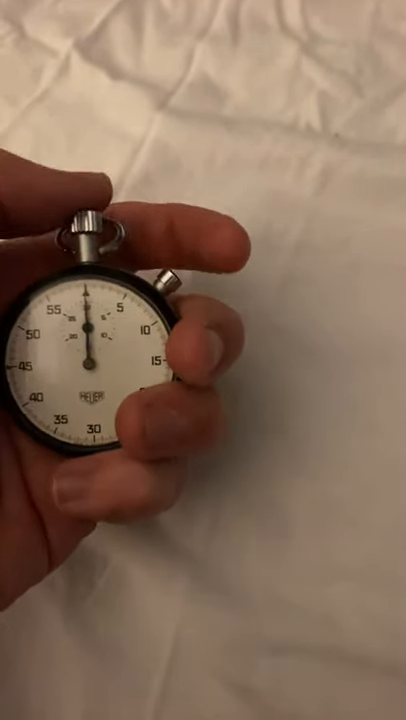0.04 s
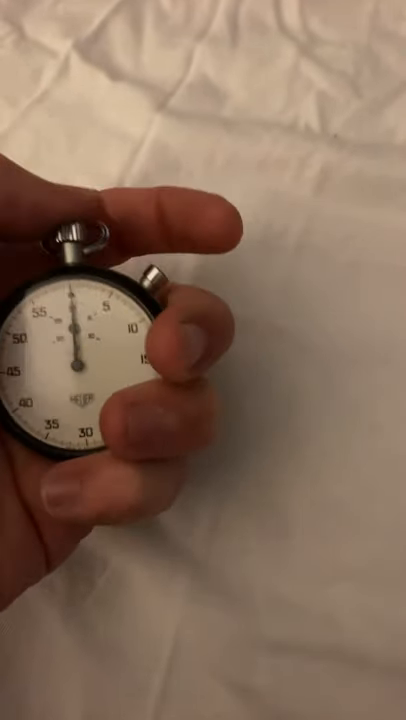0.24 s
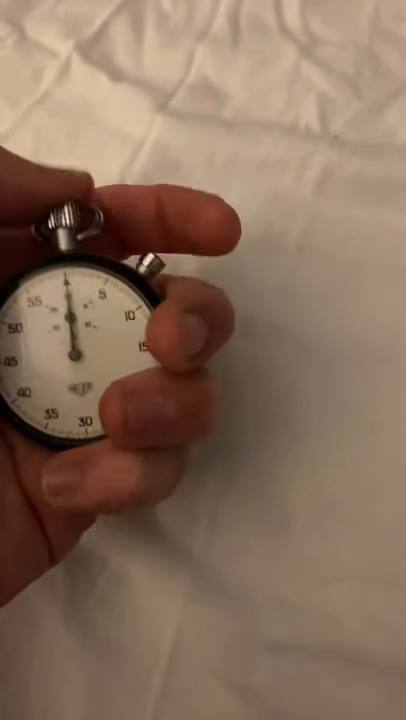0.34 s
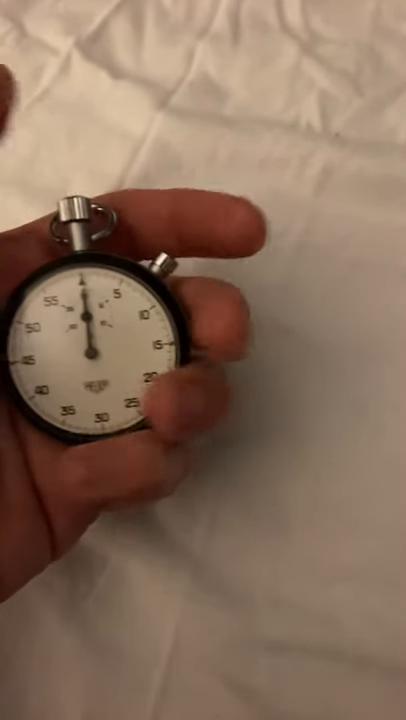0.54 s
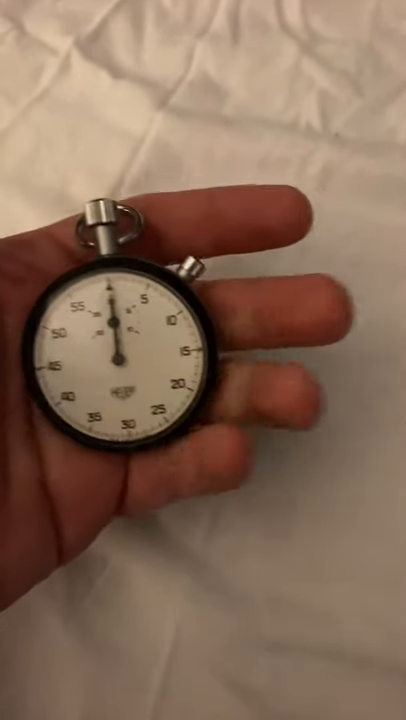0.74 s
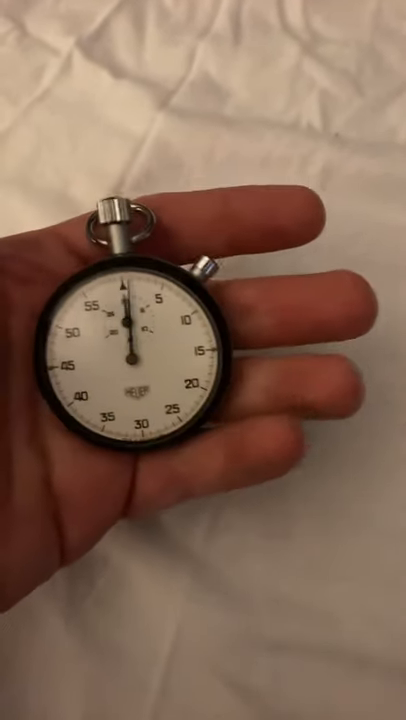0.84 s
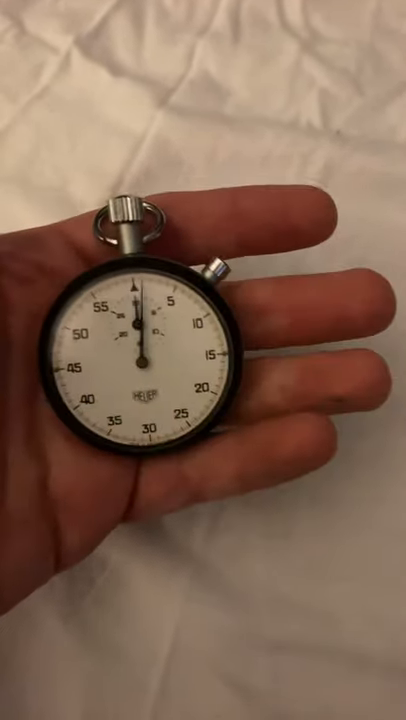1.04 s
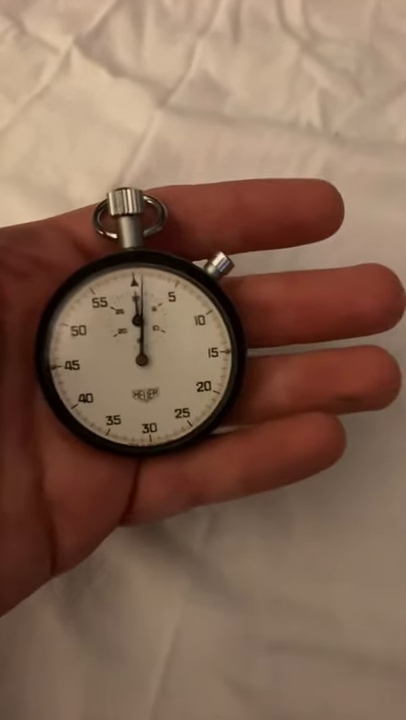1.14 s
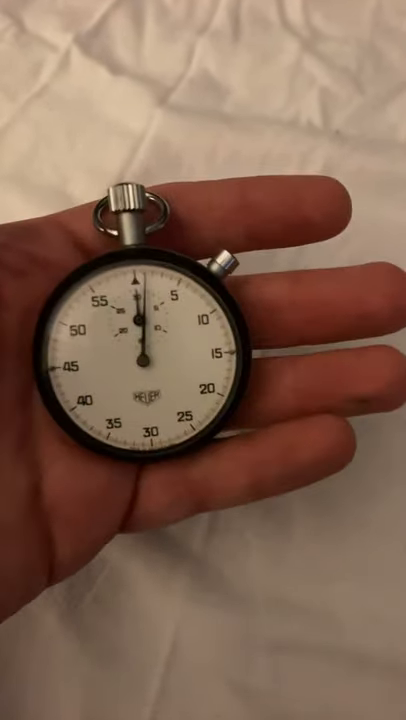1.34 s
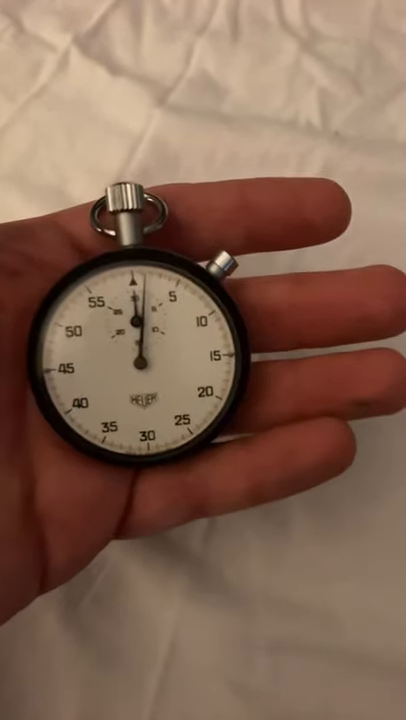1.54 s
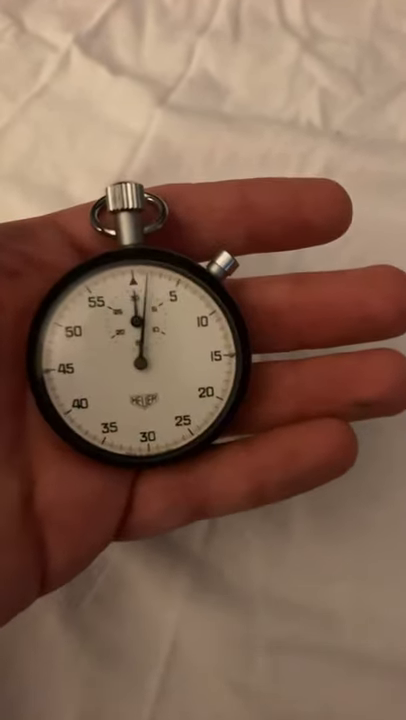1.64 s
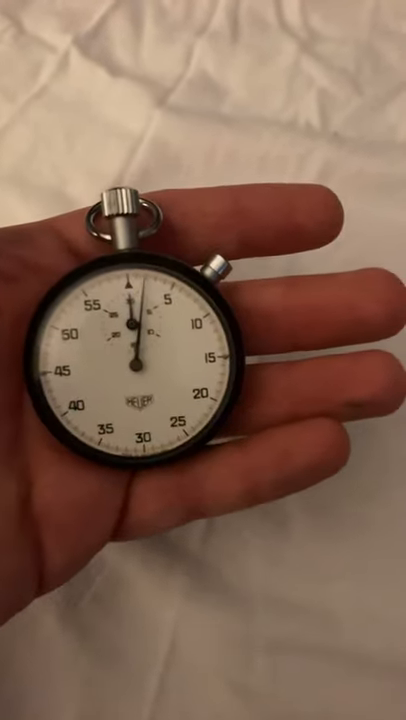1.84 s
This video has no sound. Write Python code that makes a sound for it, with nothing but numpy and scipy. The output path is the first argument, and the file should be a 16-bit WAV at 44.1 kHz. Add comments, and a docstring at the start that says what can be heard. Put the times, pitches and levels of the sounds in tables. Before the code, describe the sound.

A mechanical stopwatch crown clicks sharply down and back up, then the movement ticks very faintly

```python
"""A mechanical stopwatch is started in the hand, close to the microphone, in a small quiet room with a low hum.
The crown rubs in its stem, snaps down and springs back; each click is a noise crack over dying sines
for the case and the steel inside, and returns from nearby surfaces as echoes and diffuse noise.
Then the movement ticks faintly, five uneven beats a second, each a rattle, dying sines and a gliding ring.
The fingers slide open throughout with a thin hiss, and add a few brushes and a soft shuffle."""
import sys
import numpy as np
from scipy import signal
from scipy.fft import rfft, irfft
from scipy.io import wavfile

SR = 44100
rng = np.random.default_rng(int(sys.argv[2]) if len(sys.argv) > 2 else 0)


def to_wav(sig):
    """Store sig (one row per channel, or 1-D mono) as 16-bit WAV at the path in sys.argv[1].

    Samples outside -1..1 are clipped; the rate is SR.
    """
    pcm = np.clip(np.atleast_2d(sig), -1, 1) * 32767
    pcm = np.round(pcm).astype(np.int16)
    wavfile.write(sys.argv[1], SR, pcm.T)  # frames by channels


N = 83790
T = np.arange(N) / SR


def from_db(db):
    """Decibels to gain."""
    return 10 ** (np.asarray(db) / 20)


def dying(start, t60):
    """Envelope that jumps to 1 and falls 60 dB in t60 seconds."""
    return (T >= start) * from_db(-60 * np.maximum(T - start, 0) / t60)


def rising(start, rise_s):
    """Envelope that eases exponentially from 0 to 1."""
    return 1 - np.exp(-np.maximum(T - start, 0) / rise_s)


def noise(spectrum):
    """Steady noise of the given colour, rms 1, so the table sets only the balance of frequencies."""
    hz, db = np.transpose(spectrum)
    bin_hz = np.maximum(np.arange(N // 2 + 1) * SR / N, 1)
    colour = from_db(np.interp(np.log(bin_hz), np.log(hz), db))
    x = irfft(rfft(rng.standard_normal(N)) * colour, N)
    return x / x.std()


def ring(start, hz, db, t60):
    """Modes struck together, each a dying sine, neighbours in opposite directions."""
    out = 0
    for k, (mode_hz, mode_db, mode_t60) in enumerate(zip(hz, db, t60)):
        sine = np.sin(2 * np.pi * mode_hz * (T - start))
        out = out + (-1) ** k * from_db(mode_db) * dying(start, mode_t60) * sine
    return out


def friction(strokes, spectrum):
    """Short bell-shaped swells of rubbing noise."""
    swells = sum(from_db(db) * np.exp(-((T - s) / length) ** 2) for s, length, db in strokes)
    return noise(spectrum) * swells


PRESS_S, PRESS_DB, RELEASE_S, RELEASE_DB = .2146, -18.5, .4244, -32.5
CRACK_T60_S, PRESS_CRACK_DB, RELEASE_CRACK_DB = 0.019, -8, -10.5   # levels relative to the click
PRESS_STEEL_DB, RELEASE_STEEL_DB = -44, -51.5
THUMB_T60_S = .026   # the thumb bearing down adds this decay to every case mode
CATCH_S = 0.00063   # the lever seats a moment after its first touch
RADIATION_HZ = 630   # the small case radiates little below this
# case modes in the hand:
# (frequency [Hz], level pressed [dB re click], level released [dB re click], t60 without the thumb [s])
CASE_MODES = [(496, -16.5, -39, .014), (1316, -22.5, -22, 0.042), (1820, -38, -41, 0.004),
              (2742, -5, -5.5, 0.041), (2983, 0, -3.5, 0.028), (3184, 3, 3, 0.06), (3516, -10, -38, 0.034),
              (4456, -7.5, -15, .018), (5030, -2.5, -34, 0.011), (6175, -6, -12, 0.021),
              (7460, -29, -23, 0.015), (8750, -9, -19, 0.013), (9480, -14, -19, 0.0036),
              (10000, 1.5, -8, 0.0075), (10630, -8, -2, 0.0095), (11600, -8, -16, .008),
              (13520, -8, -18, 0.013)]
# contact crack: (frequency [Hz], relative level per Hz [dB])
CRACK_COLOUR = [(300, 13), (600, -14), (1500, 3), (2200, 2), (3000, 4), (4000, 2.5), (6000, 6), (8000, -1),
                (10000, 2.5), (12500, -2.5), (14500, -1), (16000, -9)]
# long-ringing steel inside the case: (frequency [Hz], relative level [dB], t60 [s])
STEEL_MODES = [(2960, -6.5, 0.16), (2898, -5.5, .18), (2952, -8, .22), (3096, -5, 0.26), (3150, -1, 0.169),
               (3340, -15, 0.21), (3470, -7.5, 0.11)]


def crown():
    """Press and release: a crack, the short ring of the case, the longer ring of the steel."""
    hz, pressed_db, released_db, free_t60 = np.transpose(CASE_MODES)
    steel_hz, steel_db, steel_t60 = np.transpose(STEEL_MODES)
    thumbed_t60 = 1 / (1 / free_t60 + 1 / THUMB_T60_S)   # decay rates add
    press = (PRESS_S, PRESS_DB, pressed_db, thumbed_t60, PRESS_CRACK_DB, PRESS_STEEL_DB)
    release = (RELEASE_S, RELEASE_DB, released_db, free_t60, RELEASE_CRACK_DB, RELEASE_STEEL_DB)
    out = 0
    for s, click_db, modes_db, t60, crack_db, inner_db in [press, release]:
        crack = from_db(crack_db) * dying(s, CRACK_T60_S) * noise(CRACK_COLOUR)
        snap = from_db(click_db) * (ring(s, hz, modes_db, t60) + crack)
        steel = ring(s, steel_hz, steel_db + inner_db, steel_t60)
        out = out + rising(s, CATCH_S) * (snap + steel)
    return signal.sosfilt(signal.butter(2, RADIATION_HZ, "high", fs=SR, output="sos"), out)


# the crown rubs in its stem before it gives: (time [s], half length [s], level [dB])
STEM_RUBS = [(.1435, 0.002, -65), (.21, 0.0046, -45.5), (.422, 0.0057, -59)]
# rub colour: (frequency [Hz], relative level per Hz [dB])
STEM_RUB_COLOUR = [(1500, -65), (2500, -24), (3050, 11), (3900, -14), (6300, -2), (8000, -10), (10000, -41),
                   (16000, -31)]


def stem_rubs():
    """Brief rubs of metal on metal, as noise swells a few milliseconds long."""
    return friction(STEM_RUBS, STEM_RUB_COLOUR)


FIRST_TICK_S, BALANCE_PERIOD_S, TOCK_AFTER_S = .6605, .399, .259
TICK_DB, TOCK_DB = -60.5, -65.5
SWING_START_DB, SWING_GROWTH_S = -5, 0.32   # beats grow as the balance gains swing
RATTLE_DB, RATTLE_T60_S = -12, 0.23   # level relative to the beat
# modes rung by the escapement:
# (frequency [Hz], level in ticks [dB re beat], level in tocks [dB re beat], rise [s], t60 [s])
BEAT_MODES = [(2820, -10, -17, .003, 0.17), (2997, 2, -6, 0.0047, .15), (3190, -9, -4, .004, .12),
              (3400, -12, -18, 0.0054, .15), (3670, -12, -10.5, .005, .2), (6460, -11.5, -19, .005, 0.14)]
# fine rattle of a beat: (frequency [Hz], relative level per Hz [dB])
RATTLE_COLOUR = [(2000, -29), (3200, 5), (4200, -9), (6400, -1), (8000, -19.5), (10500, -7), (15000, -16)]


def escapement():
    """A stronger and a weaker beat for each swing of the balance, each followed by the hairspring's ring."""
    out, hiss = 0, noise(RATTLE_COLOUR)
    for swing in range(4):
        for side, (lag, db) in enumerate([(0, TICK_DB), (TOCK_AFTER_S, TOCK_DB)]):
            s = FIRST_TICK_S + swing * BALANCE_PERIOD_S + lag
            growth_db = SWING_START_DB * np.exp((FIRST_TICK_S - s) / SWING_GROWTH_S)
            beat = 0
            for hz, *levels, rise, t60 in BEAT_MODES:
                beat = beat + rising(s, rise) * ring(s, [hz], [levels[side]], [t60])
            rattle = from_db(RATTLE_DB) * dying(s, RATTLE_T60_S) * hiss
            out = out + from_db(db + growth_db) * (beat + rattle) + hairspring(s, side)
    return out


# the hairspring winds (first row, tick) and unwinds (second row, tock):
# (start frequency [Hz], glide [Hz per s], loudest after [s], half length [s], level [dB])
HAIRSPRING_GLIDES = [(3227, -1250, 0.047, 0.038, -70.5), (3135, 950, .035, 0.032, -73.5)]


def hairspring(start, side):
    """A thin gliding tone that swells and fades after a beat; side 0 is the tick, 1 the tock."""
    hz, glide_hz_per_s, peak_s, length_s, db = HAIRSPRING_GLIDES[side]
    age = T - start
    swell = rising(start, CATCH_S) * np.exp(-((age - peak_s) / length_s) ** 2)
    # half the glide in the phase gives the full glide in frequency
    return from_db(db) * swell * np.sin(2 * np.pi * (hz + .5 * glide_hz_per_s * age) * age)


# fingers slide open with a thin hiss: (time [s], level [dB])
SLIDE_LEVEL = [(0, -94), (.25, -69.5), (.38, -69.5), (.85, -70.5), (1.1, -70.5), (1.3, -76), (1.42, -90),
               (1.9, -97)]
# slide colour: (frequency [Hz], relative level per Hz [dB])
SLIDE_COLOUR = [(1500, 2.5), (3900, -8), (4500, 1.5), (4800, 4.5), (5400, -9), (8000, -13.5), (15000, -19)]
# skin brushes the case: (time [s], half length [s], level [dB])
SKIN_BRUSHES = [(.87, 0.061, -75), (1.075, .012, -73.5), (1.2, 0.014, -70.5), (1.572, 0.019, -70),
                (1.875, 0.016, -82)]
# brush colour: (frequency [Hz], relative level per Hz [dB])
BRUSH_COLOUR = [(1500, -11), (3500, 1), (6000, 2), (9000, -2.5), (14000, -9), (16000, -10)]
# a soft shuffle of the hand: (time [s], half length [s], level [dB])
HAND_SHUFFLES = [(.955, 0.015, -66)]
# shuffle colour: (frequency [Hz], relative level per Hz [dB])
SHUFFLE_COLOUR = [(150, -8), (400, -16), (1300, 4), (2500, -2), (5000, -16), (10000, -32)]


def hand():
    """Skin moving on the case as the fingers open: coloured noise under slow and short swells."""
    slide = from_db(np.interp(T, *np.transpose(SLIDE_LEVEL))) * noise(SLIDE_COLOUR)
    return slide + friction(SKIN_BRUSHES, BRUSH_COLOUR) + friction(HAND_SHUFFLES, SHUFFLE_COLOUR)


ROOM_GAP_S = 0.0086   # time before the room's own diffuse sound arrives
PRESS_WASH_DB, RELEASE_WASH_DB, WASH_T60_S = -40.5, -55.5, 0.16
# the crack spreads to all sides and returns as an even, bright wash:
# (frequency [Hz], relative level per Hz [dB])
WASH_COLOUR = [(1000, -23), (2200, -13.5), (3300, 4), (3900, -4), (4700, -7), (6100, 7), (7200, -3),
               (8700, -1.5), (10100, 2), (12500, -8.5), (14500, -10.5), (16000, -20)]


def wash():
    """Short diffuse hiss that follows each click and dies exponentially."""
    swell = 0
    for click_s, db in [(PRESS_S, PRESS_WASH_DB), (RELEASE_S, RELEASE_WASH_DB)]:
        s = click_s + ROOM_GAP_S
        swell = swell + from_db(db) * rising(s, CATCH_S) * dying(s, WASH_T60_S)
    return swell * noise(WASH_COLOUR)


ROOM_DB, ROOM_T60_S, ROOM_TREBLE_T60_S, ROOM_SPLIT_HZ = -12.5, .18, 0.11, 6300
SCATTER_DB, ROOM_BUILD_S = -8, 0.002   # the first diffuse sound comes from the hand and builds up
# near surfaces: (delay [s], level [dB])
NEAR_ECHOES = [(.0092, -15), (.0112, -14), (.0177, -14), (0.0199, -19.5)]


def room(x):
    """Reflected sound: a few near echoes and a short diffuse tail whose treble dies sooner."""
    low_pass = signal.butter(2, ROOM_SPLIT_HZ, fs=SR, output="sos")
    high_pass = signal.butter(2, ROOM_SPLIT_HZ, "high", fs=SR, output="sos")
    low = signal.sosfilt(low_pass, rng.standard_normal(N))
    high = signal.sosfilt(high_pass, rng.standard_normal(N))
    tail = low * dying(0, ROOM_T60_S) + high * dying(0, ROOM_TREBLE_T60_S)
    tail = tail * (from_db(SCATTER_DB) + rising(ROOM_GAP_S, ROOM_BUILD_S))
    response = from_db(ROOM_DB) * tail / np.sqrt(np.sum(tail ** 2))   # ROOM_DB sets the tail's energy
    for delay, db in NEAR_ECHOES:
        response[int(delay * SR)] += from_db(db)
    return signal.fftconvolve(x, response)[:N]


AIR_DB, DRONE_DB = -63, -77.5
HUM_WAVER_DB, HUM_WAVER_HZ = 0.5, 8.4   # rms waver, and the rate above which it falls away
# room air: (frequency [Hz], relative level per Hz [dB])
AIR_COLOUR = [(20, -44), (32, -24), (48, -5), (110, 3), (170, -1), (280, 0), (370, -7), (620, -8.5),
              (720, -2.5), (850, -12.5), (1200, -7.5), (1650, -12), (2300, -20.5), (4400, -23.5),
              (5800, -20), (7500, -24), (8600, -28), (15500, -33)]
# faint wavering drone: (frequency [Hz], relative level per Hz [dB])
DRONE_COLOUR = [(400, -42), (660, -41.5), (695, 4), (712, -10.5), (750, -22), (1100, -42)]
# mains hum: (frequency [Hz], rms level [dB])
MAINS_HUM = [(119.8, -71), (240, -75.5)]


def background():
    """Room air and a faint drone as coloured noise, and a mains hum of sines with a slow random waver."""
    waver = from_db(HUM_WAVER_DB * noise([(HUM_WAVER_HZ, 0), (4 * HUM_WAVER_HZ, -80)]))
    hum = 0
    for hz, db in MAINS_HUM:
        hum = hum + np.sqrt(2) * from_db(db) * np.sin(2 * np.pi * (hz * T + rng.random()))
    air = from_db(AIR_DB) * noise(AIR_COLOUR)
    drone = from_db(DRONE_DB) * noise(DRONE_COLOUR)
    return air + drone + waver * hum


TICK_ROOM_DB = -13   # the ticks send this much less into the room than the clicks do


def scene():
    """The watch in its room, the hand and the background."""
    clicks = crown() + stem_rubs()
    ticks = escapement()
    reflected = room(clicks + from_db(TICK_ROOM_DB) * ticks) + wash()
    return (clicks + ticks + reflected + hand() + background())[None]


CUTOFF_HZ = 16000


def record(dry):
    """The microphone's top is cut steeply by an elliptic low-pass."""
    return signal.sosfilt(signal.ellip(10, .1, 70, CUTOFF_HZ, fs=SR, output="sos"), dry)


dry = scene()
out = record(dry)
to_wav(out)
```